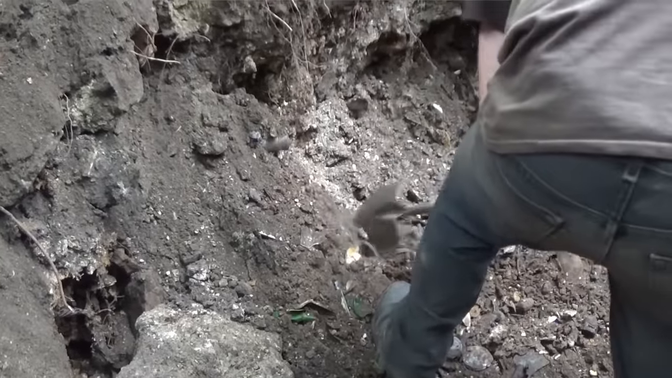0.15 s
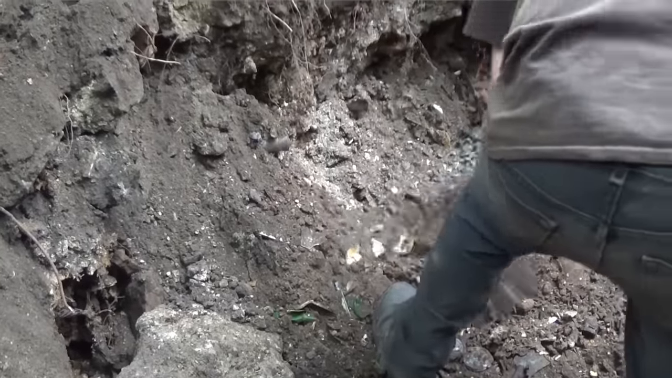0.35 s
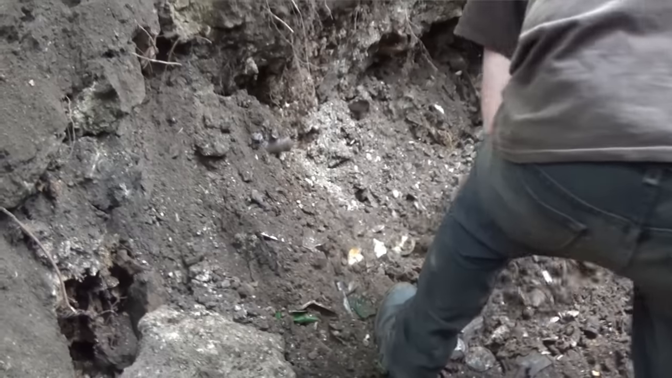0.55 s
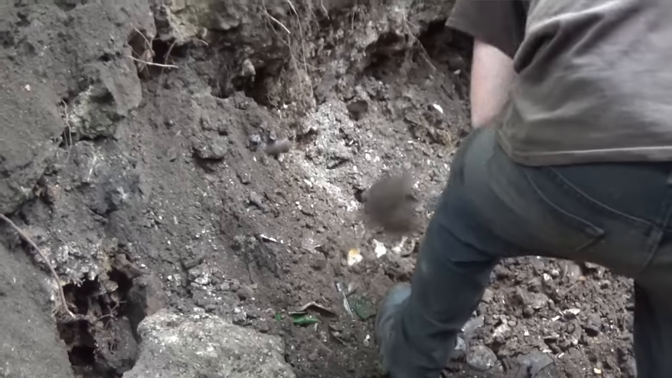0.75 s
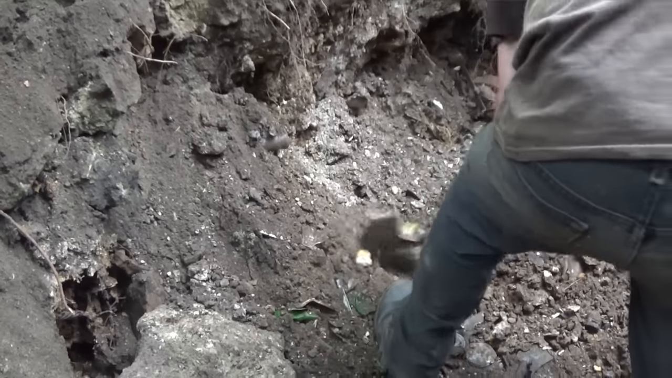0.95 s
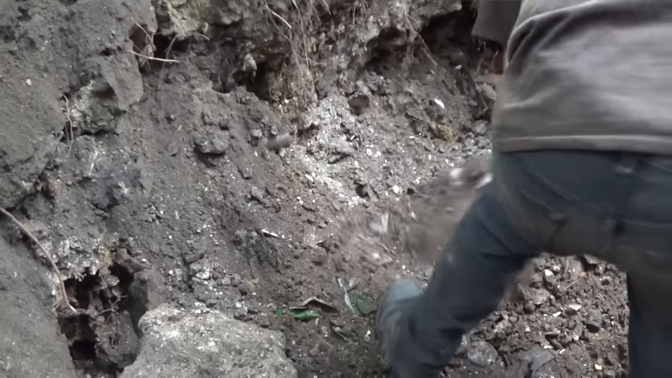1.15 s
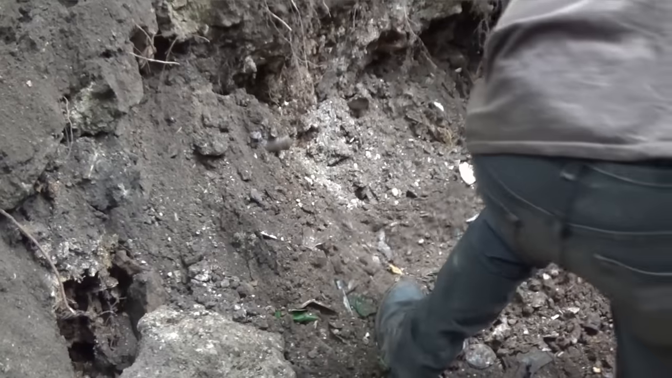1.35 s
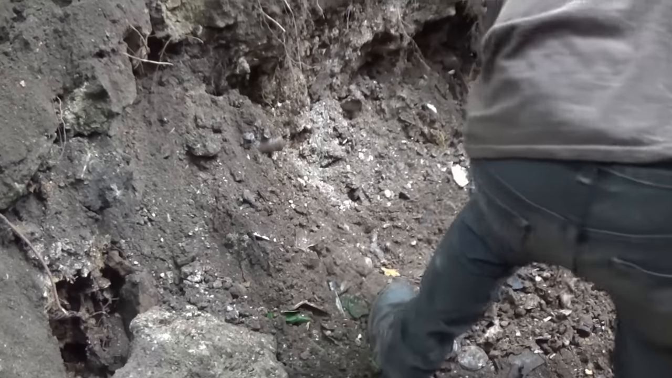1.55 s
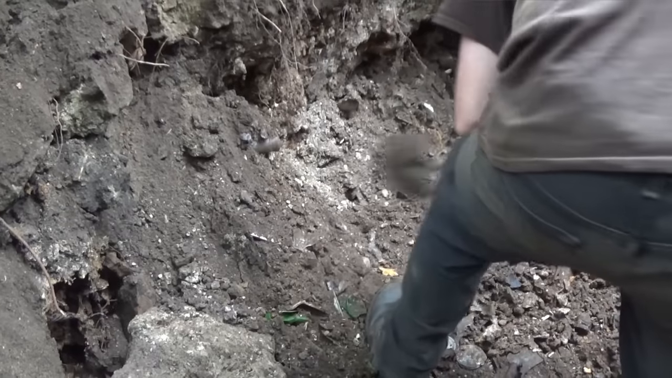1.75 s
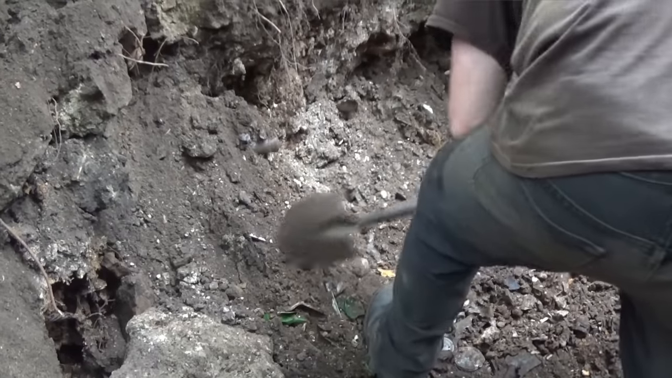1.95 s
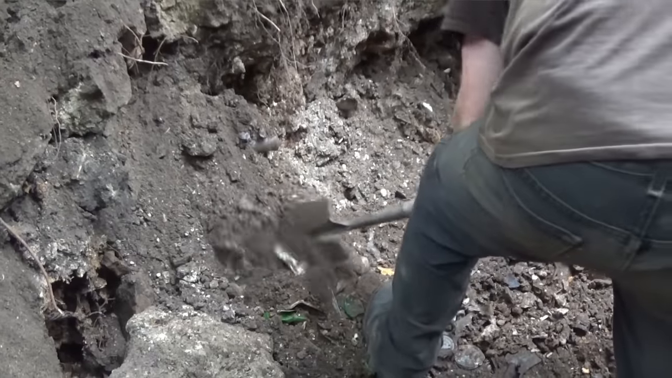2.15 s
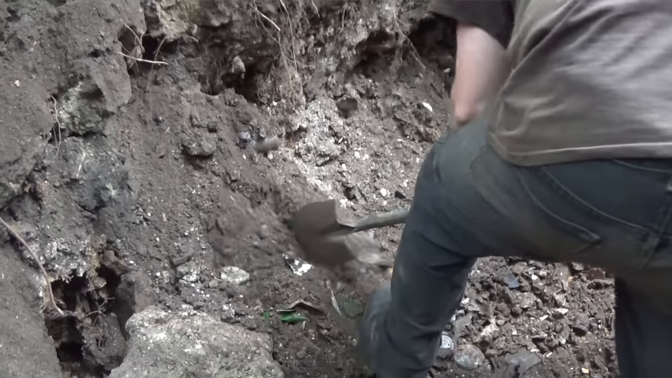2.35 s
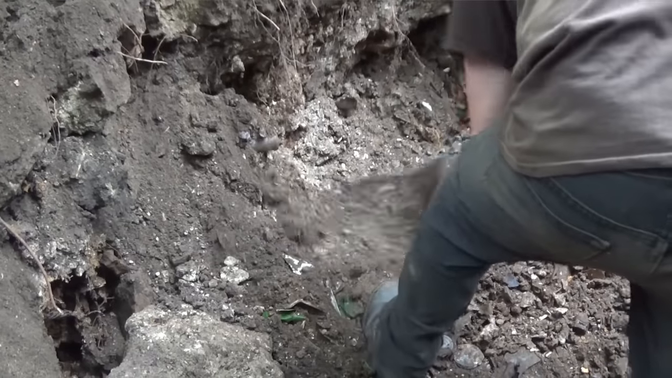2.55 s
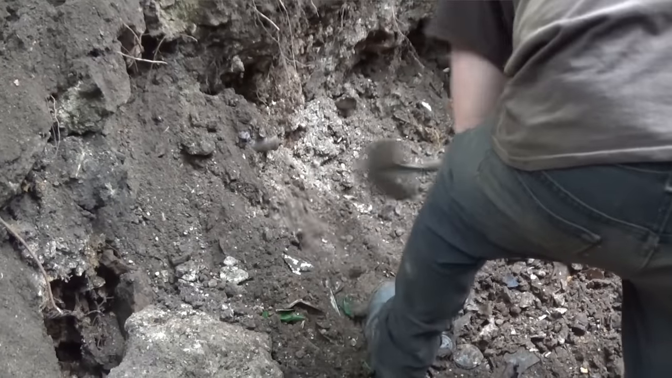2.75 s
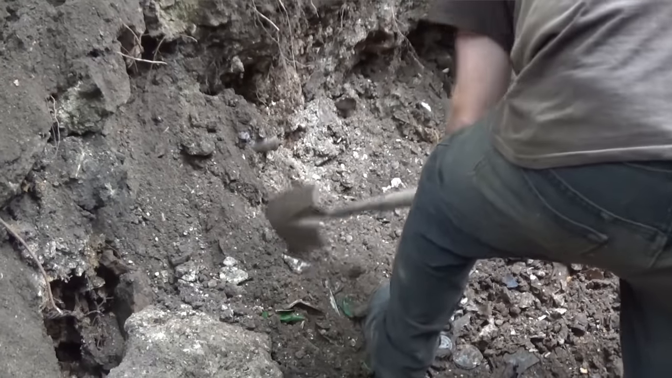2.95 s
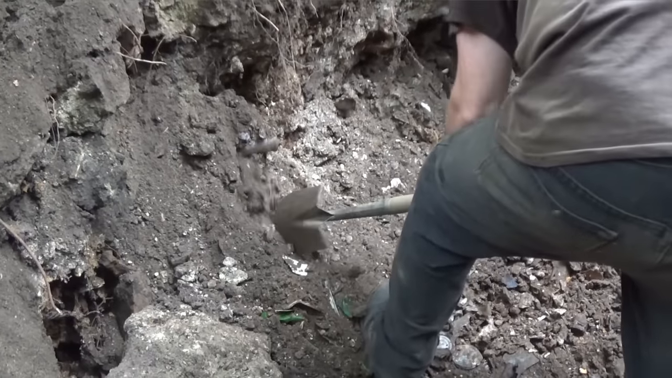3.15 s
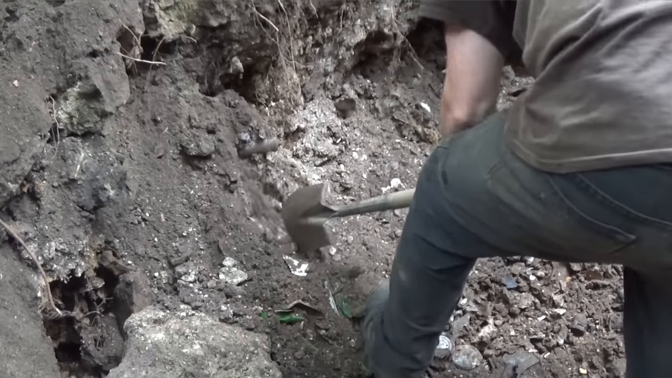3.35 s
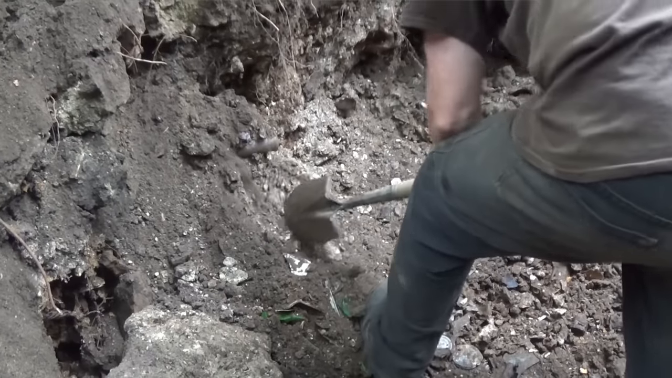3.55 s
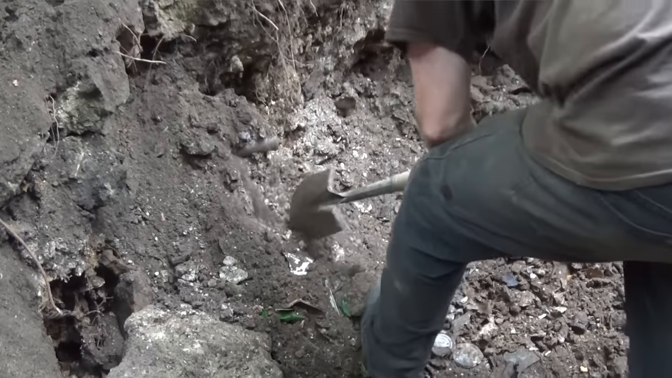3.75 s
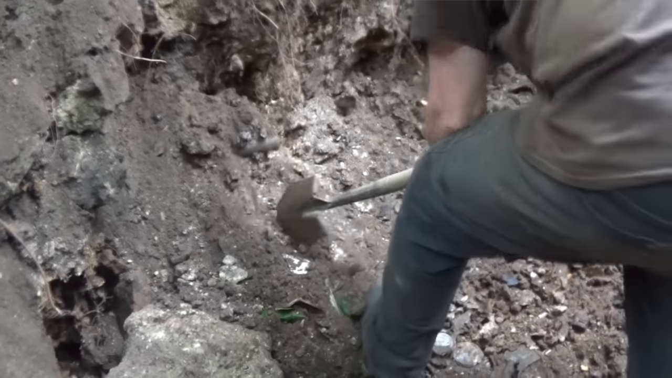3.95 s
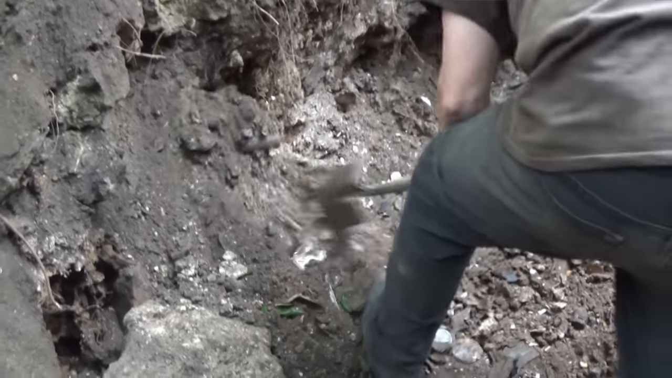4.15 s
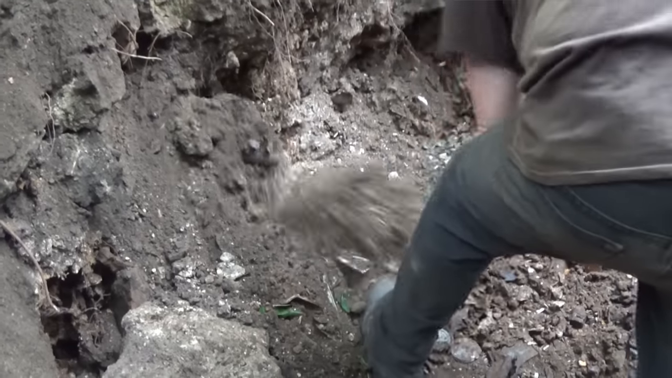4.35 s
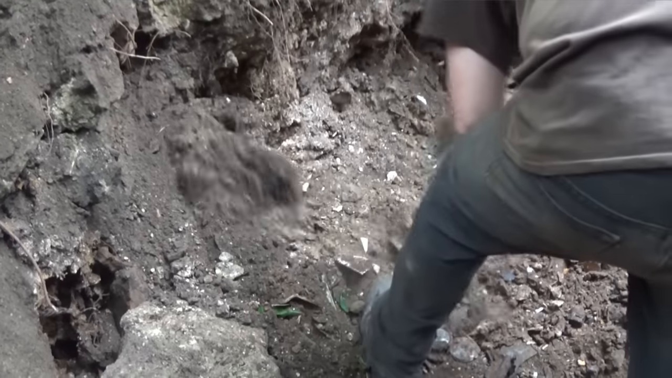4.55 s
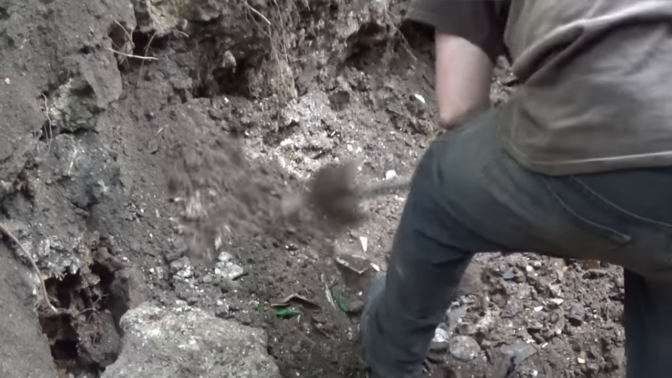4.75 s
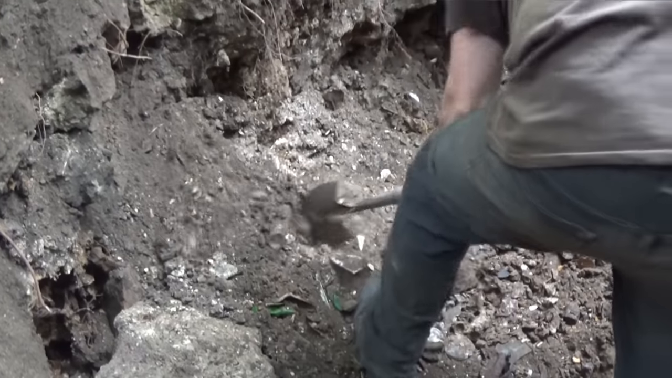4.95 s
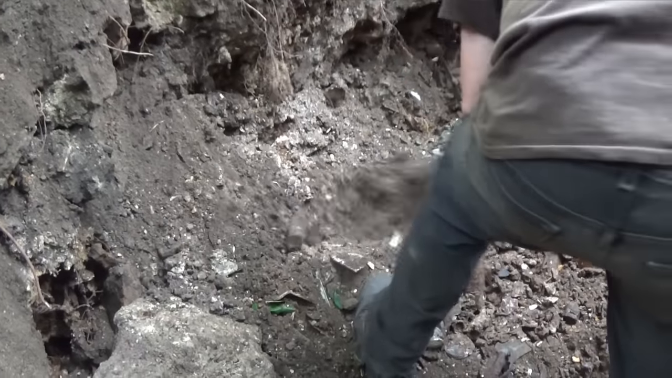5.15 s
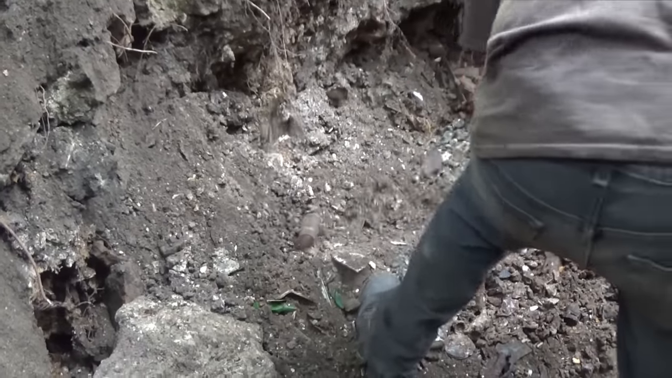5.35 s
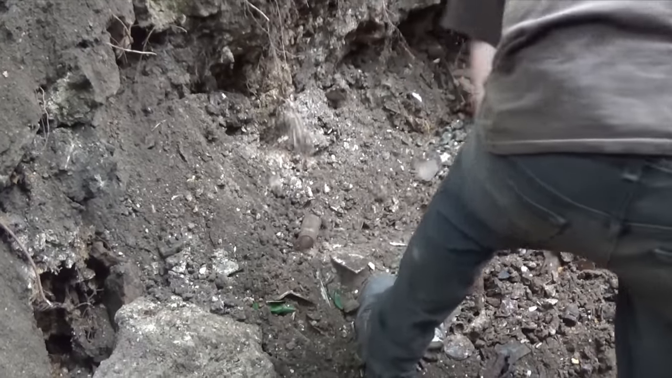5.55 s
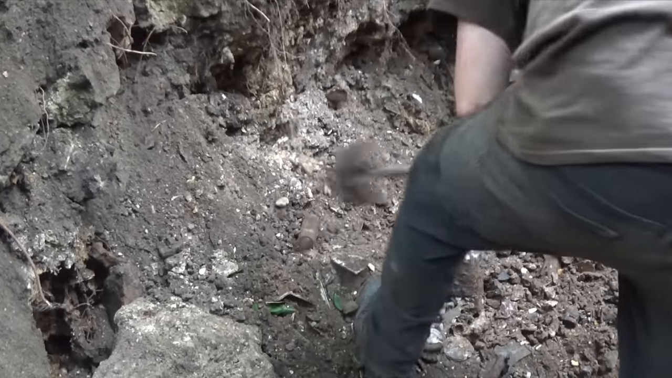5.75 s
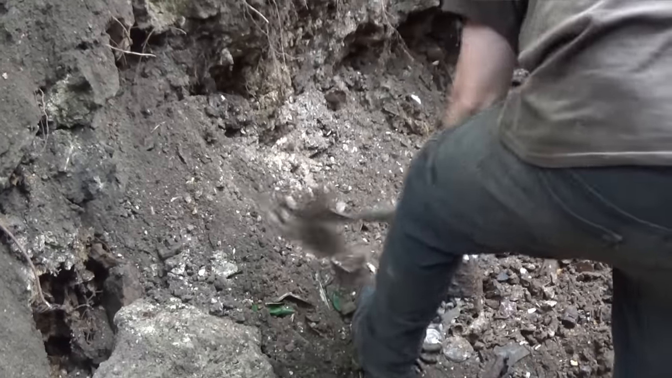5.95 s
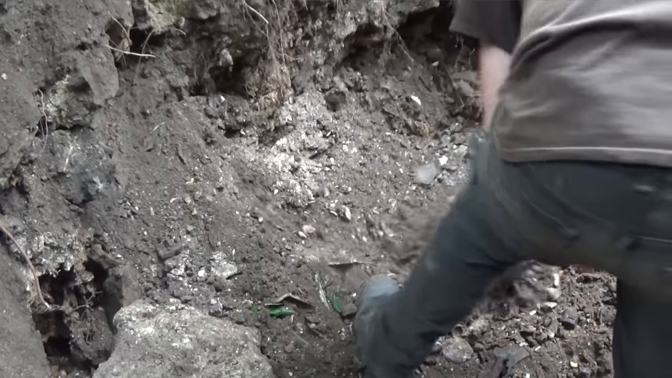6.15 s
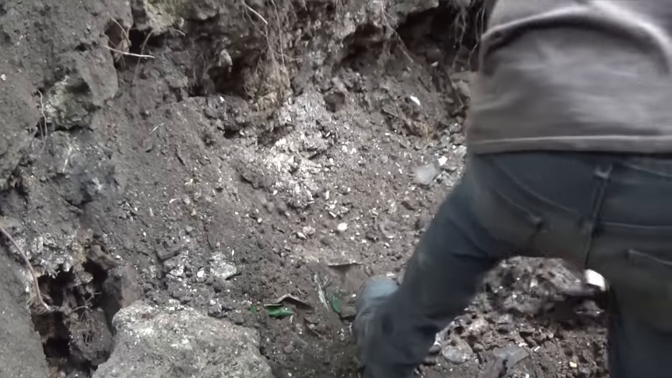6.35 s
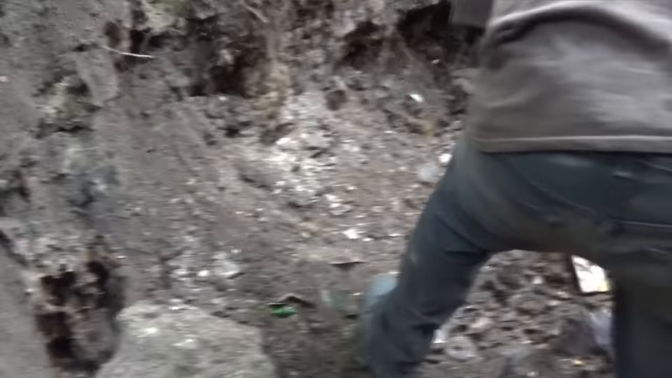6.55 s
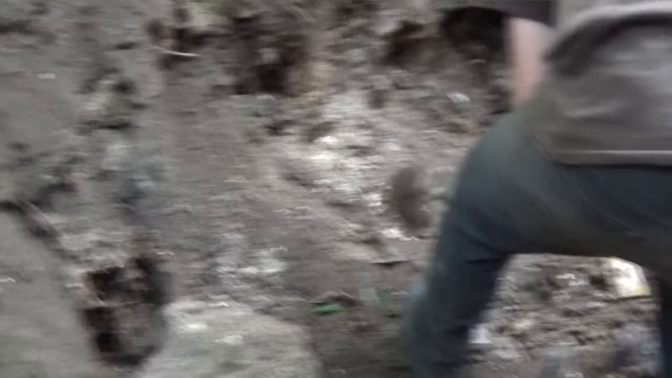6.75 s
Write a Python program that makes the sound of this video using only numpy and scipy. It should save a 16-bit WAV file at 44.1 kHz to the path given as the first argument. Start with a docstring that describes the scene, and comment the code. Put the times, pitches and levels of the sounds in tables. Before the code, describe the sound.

A steel shovel chops and scrapes into a dry bank of soil, stones and broken glass, rubble trickling down with clinking shards, close by outdoors.

```python
"""Shovelling soil, stones and glass

A steel shovel chops into a dry bank of soil, stones and broken glass, outdoors and close by.
Each stroke grinds bursts of grit noise through the blade's resonances; rubble trickles down as looser
noise grains with ringing splinters. Shards clink as decaying sine pairs, stones knock and pebbles tick
as short noise cracks, clods thud as dull noise bursts, and the freed or juddering blade rings."""
import sys
import numpy as np
from scipy import signal
from scipy.io import wavfile
from scipy.ndimage import uniform_filter1d

SR = 44100
rng = np.random.default_rng(int(sys.argv[2]) if len(sys.argv) > 2 else 0)


def log_audio(samples):
    """Write samples as a 16-bit WAV file to the path given in sys.argv[1]."""
    # one column per channel
    frames = np.atleast_2d(samples).T
    # limit to full scale, then quantise
    limited = np.clip(frames, -1, 1)
    pcm = np.round(limited * 32767).astype(np.int16)
    wavfile.write(sys.argv[1], SR, pcm)


N = 303849
TIME = np.arange(N) / SR
BODY_EDGE_HZ = 2200  # noise bands centred above this are grit, the others body
CUTOFF_HZ = 16200
EDGES = 22 * 2 ** (np.arange(30) / 3)  # third-octave band edges, Hz
CENTRES = np.sqrt(EDGES[1:] * EDGES[:-1])
BANK = [signal.butter(2, edge, "band", fs=SR, output="sos") for edge in zip(EDGES, EDGES[1:])]


def from_db(db):
    """Decibels to gain."""
    return 10 ** (np.asarray(db) / 20)


def rms_one(x):
    """Scale to rms 1."""
    return x / np.sqrt(np.mean(x ** 2) + 1e-20)


def evened(x, span_s):
    """Hold the running level near 1 while keeping single grains sharp."""
    power = np.abs(uniform_filter1d(x ** 2, int(span_s * SR)))
    return x / np.sqrt(power + 1e-12)


def add(out, s, sound):
    """Mix a sound in at time s."""
    start = max(int(s * SR), 0)
    out[start:start + len(sound)] += sound[:N - start]


def bands(spectrum, size=N):
    """Third-octave noise bands with the given colour, one per row."""
    hz, db = np.transpose(spectrum)
    gains = from_db(np.interp(np.log(CENTRES), np.log(hz), db))
    white = rng.standard_normal((2, size))  # neighbouring bands use different noise
    rows = [gain * signal.sosfilt(sos, white[k % 2]) for k, (gain, sos) in enumerate(zip(gains, BANK))]
    return np.array(rows)


def ring(clicks, hz, t60):
    """A unit click sets a decaying sine of starting height 1 ringing."""
    r = from_db(-60 / (t60 * SR))
    w = 2 * np.pi * hz / SR
    return signal.lfilter([0, np.sin(w)], [1, -2 * r * np.cos(w), r * r], clicks + 1e-18)


def contacts(per_s, spread_db):
    """Random contacts: sample positions and sizes, many small and a few large."""
    at = np.flatnonzero(rng.random(N) < per_s / SR)
    sizes = from_db(spread_db * np.minimum(rng.exponential(1, len(at)), 3.3))
    return at, sizes


def signed_clicks(per_s, spread_db):
    """Random contacts as single-sample clicks of either sign."""
    at, sizes = contacts(per_s, spread_db)
    clicks = np.zeros(N)
    clicks[at] = sizes * rng.choice([-1, 1], len(at))
    return clicks


def crunch(spectrum, per_s, spread_db, colour_db, edge_decay_s):
    """Grains crack in tiny bursts, each with its own colour; lows die more slowly. Returns grit, body."""
    at, sizes = contacts(per_s, spread_db)
    noise = bands(spectrum)
    tint = rng.standard_normal(len(at))
    for band, hz in zip(noise, CENTRES):
        tint = (tint + rng.standard_normal(len(at))) / np.sqrt(2)  # neighbouring bands are alike
        energy = np.zeros(N)
        energy[at] = (sizes * from_db(colour_db * tint)) ** 2
        # edge_decay_s is the energy time constant at BODY_EDGE_HZ
        keep = np.exp(-1 / (SR * edge_decay_s * np.sqrt(BODY_EDGE_HZ / hz)))
        band *= np.sqrt(signal.lfilter([1 - keep], [1, -keep], energy + 1e-18))
    is_grit = CENTRES > BODY_EDGE_HZ
    return noise[is_grit].sum(0), noise[~is_grit].sum(0)


CHATTER_S, SIDE_MODE_DB = 0.0021, -9.5  # hold before the fade; starting level of the second mode


def shard(hz, t60):
    """A piece holds briefly, then rings in a main mode and a weaker, shorter one at an unrelated pitch."""
    t = TIME[:int((CHATTER_S + t60) * SR) + 1]
    fade = np.exp(-np.log(1000) * np.maximum(t - CHATTER_S, 0) / t60)
    second_hz = hz * 2 ** rng.uniform(-0.496, 0.487)
    main = np.sin(2 * np.pi * hz * t)
    second = from_db(SIDE_MODE_DB) * fade * np.sin(2 * np.pi * second_hz * t)
    return fade * (main + second)


def splinters(per_s, spread_db, base_t60, low_hz, high_hz):
    """Small hard bits ring briefly at random, each at its own pitch."""
    at, sizes = contacts(per_s, spread_db)
    pitches = low_hz + (high_hz - low_hz) * rng.beta(2, 2, len(at))
    decays = base_t60 * 2 ** rng.uniform(0.59, 1, len(at))  # 1.5 to 2 times the base
    out = np.zeros(N)
    for start, size, hz, decay in zip(at, sizes, pitches, decays):
        add(out, start / SR, size * shard(hz, decay))
    return rms_one(out)


def pit(x, t60, dull_hz=6000):
    """The rough earth walls scatter a short, dull echo, made with decaying band-limited noise."""
    t = TIME[:SR // 2]
    scatter = rng.standard_normal(len(t)) * from_db(-60 * t / t60)
    scatter = signal.sosfilt(signal.butter(1, [250, dull_hz], "band", fs=SR, output="sos"), scatter)
    return signal.fftconvolve(x, scatter / np.linalg.norm(scatter))[:N]


BITE_S = 0.0014  # attack of trickles and lumps


def envelope(start, length, attack_s, fall_db_per_s, slope_db=0):
    """Rise, hold for the length while the level slopes, then die away."""
    age = TIME - start
    progress = np.clip(age / length, 0, 1)
    fall_db = fall_db_per_s * np.clip(age - length, 0, 2)
    return np.clip(age / attack_s, 0, 1) * from_db(slope_db * (progress - .5) - fall_db)


# Colour of the open air. Each row: frequency in Hz, band gain in dB.
AIR = [(22, -16), (70, 0.5), (157, -10.5), (400, -12.5), (1900, -14), (8000, -21.5), (16000, -32)]
AIR_DB, HUM_HZ, HUM_DB = -49, 44.8, -53.5  # rms levels in dB


def outdoors():
    """Faint outdoor air as coloured noise, with a low, unsteady drone from a noise-driven resonance."""
    air = rms_one(bands(AIR).sum(0))
    drone = rms_one(ring(rng.standard_normal(N), HUM_HZ, t60=0.65))
    return from_db(AIR_DB) * air + from_db(HUM_DB) * drone


# Steel blade resonances. Each row: frequency in Hz, width in Hz, gain in dB over the plain contact sound.
BLADE = [(679, 180, 8.5), (1240, 360, 5.5), (2460, 72, -5), (3173, 59, 8), (3710, 170, -2), (5860, 56, -34),
         (8090, 130, 2)]


def blade(x):
    """The steel adds its resonances to whatever touches it."""
    out = x.copy()
    for hz, width, db in BLADE:
        r = np.exp(-np.pi * width / SR)
        peak = np.array([1, 0, -1]) * (1 - r * r) / 2
        poles = [1, -2 * r * np.cos(2 * np.pi * hz / SR), r * r]
        out += from_db(db) * signal.lfilter(peak, poles, x)
    return out


# The blade is pushed through the bank. Each row: start in seconds, length in seconds,
# grit level in dB, body level in dB.
STROKES = [(-0.016, 0.037, -16.5, -25), (0.018, 0.026, -22, -31), (0.115, 0.075, -20.5, -37.5),
           (0.199, 0.034, -21, -35), (0.831, 0.079, -20, -33), (0.913, 0.16, -24.5, -38.5),
           (1.996, 0.036, -24, -26.5), (2.023, 0.14, -29, -35.5), (2.156, 0.076, -21, -27),
           (2.333, 0.043, -17.5, -34), (2.384, 0.03, -17.5, -27), (2.94, 0.083, -20.5, -32),
           (3.037, 0.041, -27, -39), (3.319, 0.14, -33, -44.5), (3.385, 0.027, -21, -43),
           (3.538, 0.12, -32, -41), (3.881, 0.0806, -24, -30.5), (4.08, 0.12, -25, -36),
           (4.164, 0.031, -18, -32), (4.198, 0.066, -19, -48), (4.797, 0.057, -17.5, -45),
           (4.852, 0.073, -17, -29), (5.876, 0.043, -25.5, -37), (5.932, 0.089, -17.5, -32.5),
           (6.021, 0.096, -22.5, -33)]
SWELL_S, STOP_S = .016, 0.0075  # rise time; time constant of the stop
BODY_SLOPE_DB = -0.5  # change of the body over a push
TRICKLE_DB, TRICKLE_DB_PER_S = -14.5, 127  # level below the push; speed of dying


def stroke_gains():
    """Grit and body gains: each push swells, holds, stops and leaves a dying trickle."""
    power = np.zeros((2, N))
    stop_db_per_s = 20 / np.log(10) / STOP_S
    for start, length, grit_db, body_db in STROKES:
        trickle = from_db(TRICKLE_DB) * envelope(start, length, BITE_S, TRICKLE_DB_PER_S)
        for part, db, slope_db in zip(power, (grit_db, body_db), (0, BODY_SLOPE_DB)):
            push = envelope(start, length, SWELL_S, stop_db_per_s, slope_db)
            part += from_db(db) ** 2 * (push ** 2 + trickle ** 2)
    return np.sqrt(power)


# Colour of soil scraping on steel, before the blade resonances. Each row: frequency in Hz, band gain in dB.
SCRAPE = [(60, -58), (170, -5.5), (370, -17), (620, -10.5), (2000, -4.5), (6300, 4.5), (10700, 2),
          (16000, -23)]


def strokes():
    """Dense grit and glass grind along the blade, exciting its resonances."""
    grit_gain, body_gain = stroke_gains()
    grit, body = crunch(SCRAPE, per_s=700, spread_db=3.5, colour_db=2, edge_decay_s=0.0019)
    glass = splinters(per_s=900, spread_db=5.0, base_t60=.016, low_hz=1477, high_hz=11450)
    grit = rms_one(grit) + from_db(-6) * glass
    grit = evened(blade(grit), span_s=0.039)
    body = evened(blade(body), span_s=0.052)
    return grit_gain * grit + body_gain * body


def snaps(per_s, spread_db, level_db, hz, t60):
    """Now and then one grain splits with a needle-sharp click, louder where more grit is moving."""
    clicks = signed_clicks(per_s, spread_db)
    moving = np.hypot(stroke_gains()[0], rubble_gains()[0])
    return from_db(level_db) * moving * np.gradient(ring(clicks, hz, t60))


def crumbs(per_s, spread_db, level_db):
    """Single crumbs keep dropping off the bank with tiny bright scattered ticks."""
    at, sizes = contacts(per_s, spread_db)
    drops = np.zeros(N)
    drops[at] = sizes
    bright = np.gradient(pit(drops, t60=0.042))  # the slope favours the treble
    return from_db(level_db) * rms_one(bright)


# Loosened rubble pours down. Each row: start in seconds, length in seconds,
# grit level in dB, body level in dB.
SLIDES = [(0.241, 0.11, -26.5, -37.5), (0.372, 0.14, -30.5, -47.5), (0.546, 0.063, -35, -49),
          (1.06, 0.41, -28, -36), (1.509, 0.14, -27, -31.5), (1.711, 0.19, -29.5, -38.5),
          (2.52, 0.075, -30, -41.5), (3.983, 0.1, -27, -38), (4.277, 0.46, -31.5, -42),
          (4.982, 0.13, -27, -39), (5.147, 0.1, -24.5, -33.5), (5.382, 0.062, -33, -45.5),
          (5.555, 0.098, -39.5, -44.5), (6.077, 0.42, -22.5, -30.5), (6.52, 0.35, -28.5, -38)]
GATHER_S, THINNING_DB, SETTLE_DB_PER_S = 0.033, 3, 123  # rise; drop while pouring; speed of dying
# Lumps of rubble land and burst. Each row: start in seconds, grit level in dB, body level in dB.
LUMPS = [(1.04, -20.5, -50), (1.157, -21.5, -28.5), (1.363, -20, -47), (1.417, -20.5, -50),
         (1.446, -19, -47), (1.556, -18.5, -28), (3.549, -24.5, -47), (3.602, -22, -34),
         (4.131, -19, -22.5), (4.583, -16.5, -30), (5.046, -15.5, -45), (5.096, -38, -28),
         (6.088, -30, -21), (6.174, -21, -34), (6.271, -24, -28.5), (6.405, -22, -32), (6.769, -26, -24.5)]
BURST_S, BURST_DB_PER_S = 0.0061, 448  # a lump crumbles for a moment, then dies away


def rubble_gains():
    """Grit and body gains: slides gather, thin and settle, and lumps burst on top of them."""
    power = np.zeros((2, N))
    for start, length, *levels in SLIDES:
        pour = envelope(start, length, GATHER_S, SETTLE_DB_PER_S, -THINNING_DB)
        power += np.outer(from_db(levels), pour) ** 2
    for start, *levels in LUMPS:
        burst = envelope(start, BURST_S, BITE_S, BURST_DB_PER_S)
        power += np.outer(from_db(levels), burst) ** 2
    return np.sqrt(power)


# Colour of tumbling rubble. Each row: frequency in Hz, band gain in dB.
RUBBLE = [(60, -29), (160, -6), (370, -8), (600, -2.5), (2000, 0.5), (6800, 4), (10900, -3.5), (16000, -33)]
# How much glass the falling rubble holds. Each row: time in seconds, glass level in dB relative to the grit.
GLASSINESS = [(1.1, 1), (1.65, -5.5), (2.6, -3.5), (6.2, -5)]


def slides():
    """Loose crumbs, pebbles and splinters tumble over each other as noise grains and short rings."""
    grit_gain, body_gain = rubble_gains()
    grit, body = crunch(RUBBLE, per_s=380, spread_db=3.5, colour_db=5.0, edge_decay_s=0.0033)
    glass = splinters(per_s=330, spread_db=4.5, base_t60=.019, low_hz=1930, high_hz=11940)
    pebbles = splinters(per_s=220, spread_db=1.5, base_t60=0.032, low_hz=347, high_hz=2507)
    glass_gain = from_db(np.interp(TIME, *np.transpose(GLASSINESS)))
    grit = evened(rms_one(grit) + glass_gain * glass, span_s=0.197)
    body = evened(rms_one(body) + from_db(0.5) * pebbles, span_s=0.069)
    return grit_gain * grit + body_gain * body


# Blade or stone cracks on a stone. Each row: time in seconds, relative strength in dB,
# body trim in dB against the common body level.
KNOCKS = [(0.247, -2.5, -17.5), (0.317, -8, -24), (0.538, -7.5, -26.5), (0.814, -1, -29.5),
          (0.978, -5, -17.5), (1.155, -12.5, -10), (1.558, -16, -6), (1.996, -1.5, -37), (2.027, -7, -10.5),
          (2.084, -4, -13), (2.46, -7, -30), (2.941, -0.5, -47), (3.15, -10.5, -22.5), (3.669, -6, -15),
          (3.865, -12.5, -26), (3.909, -4.5, -26), (4.088, -1.5, -26), (4.8, -0.5, -21), (5.258, -8, -14),
          (5.868, 0, -22), (5.9, -7.5, -12.5), (6.257, -4.5, -23), (6.463, -17, 3.5), (6.688, -5.5, -10),
          (6.835, 0, -23.5)]


def knocks(colour_db, grit_db, body_db, crush_s, t60):
    """A hard contact is one sharp noise crack with a colour of its own; harder ones crush for longer."""
    out, t = np.zeros(N), TIME[:SR // 10]
    noise = bands(SCRAPE, size=SR)
    is_grit = CENTRES > BODY_EDGE_HZ
    for s, db, body_trim_db in KNOCKS:
        start = rng.integers(SR - len(t))
        colour = from_db(colour_db * rng.standard_normal((len(CENTRES), 1)))
        piece = noise[:, start:start + len(t)] * colour
        grit = rms_one(blade(piece[is_grit].sum(0)))
        body = rms_one(blade(piece[~is_grit].sum(0)))
        crack = from_db(grit_db) * grit + from_db(body_db + body_trim_db) * body
        crush = from_db(-60 * np.maximum(t - crush_s * from_db(db), 0) / t60)
        add(out, s, crack * from_db(db) * crush)
    return out


# Glass shards and stones clink. Each row: time in seconds, main pitch in Hz, main mode level in dB,
# t60 in seconds.
CLINKS = [(0.452, 5230, -12.5, .035), (.454, 5840, -23.5, .2), (.476, 8130, -18.5, 0.044),
          (.632, 7500, -25.5, 0.075), (.668, 4200, -39, 0.073), (1.552, 13178, -19, .03),
          (1.556, 455, -30, .07), (1.588, 6230, -20, .018), (1.618, 5500, -16, 0.033),
          (1.636, 5180, -9.5, 0.021), (1.666, 4560, -11, 0.033), (1.757, 6060, -19, .018),
          (1.876, 5530, -13, 0.082), (2.508, 5670, -28, 0.039), (2.508, 9800, -22, 0.064),
          (4.577, 4980, -14.5, 0.013), (4.823, 5940, -16.5, 0.24), (5.287, 6830, -22.5, .04),
          (5.657, 6900, -15.5, 0.012), (6.276, 624, -19.5, 0.11), (6.31, 7000, -15, 0.036),
          (6.696, 737, -25.5, 0.1), (6.696, 1510, -23.5, 0.082), (6.771, 3007, -14, 0.12),
          (6.77, 6500, -23, 0.2)]


def clinks(tick_db, tick_t60):
    """A struck piece rings in two modes, with a noise tick at the contact."""
    out, t = np.zeros(N), TIME[:SR // 2]
    for s, hz, db, t60 in CLINKS:
        add(out, s, from_db(db) * shard(hz, t60))
        add(out, s, rng.standard_normal(len(t)) * from_db(db + tick_db - 60 * t / tick_t60))
    return out


# A pebble or chip ticks once. Each row: time in seconds, peak level in dB before panning, pitch in Hz.
TICKS = [(1.021, -15, 4560), (1.201, -9, 5200), (1.306, -11, 3460), (1.716, -16.5, 1480),
         (2.253, -19, 1250), (2.267, -14, 1450), (2.461, -12, 2540), (3.263, -10, 8000), (3.8, -14.5, 5960),
         (4.025, -15, 830), (4.291, -8.5, 6300), (4.367, -9, 7160), (4.452, -7.5, 3060), (4.75, -12, 5600),
         (4.97, -10, 3530), (5.202, -8.5, 2500), (6.612, -10.5, 7500), (6.655, -12, 1220),
         (6.688, -6, 2020)]


def ticks(edge_t60, width_octaves, crack_db):
    """A tiny crack sets a heavily damped pebble sounding; lower ones last longer."""
    out, t = np.zeros(N), TIME[:SR // 10]
    for s, db, hz in TICKS:
        t60 = edge_t60 * np.sqrt(BODY_EDGE_HZ / hz)
        crack = rng.standard_normal(len(t)) * from_db(-60 * t / t60)
        edges = np.minimum(hz * 2 ** (width_octaves * np.array([-.5, .5])), CUTOFF_HZ)
        pebble = signal.sosfilt(signal.butter(2, edges, "band", fs=SR, output="sos"), crack)
        tick = rms_one(pebble) + from_db(crack_db) * rms_one(uniform_filter1d(crack, size=3))
        add(out, s, from_db(db) * tick / np.abs(tick).max())
    return out


# Clods landing. Each row: time in seconds, relative level in dB.
THUDS = [(1.16, -26), (1.554, -27), (5.199, -30), (6.411, -14.5), (6.462, -13.5)]
# Dull colour of a landing clod. Each row: frequency in Hz, band gain in dB.
CLOD = [(70, -25), (140, -10), (210, -4.5), (330, -16.5), (1000, -15), (3000, -23), (9000, -46)]


def thuds(rise_s, t60, level_db):
    """Soft clods land with a dull, short noise burst."""
    push = np.zeros(N)
    for s, db in THUDS:
        age = np.maximum(TIME - s, 0)
        push += (1 - np.exp(-age / rise_s)) * from_db(db - 60 * age / t60)
    return from_db(level_db) * push * evened(bands(CLOD).sum(0), span_s=0.036)


# The blade swings clear of the soil and rings on. Each row: time in seconds, relative strength in dB.
RELEASES = [(1.446, -3.5), (2.607, -7.5)]
# Modes of the free blade. Each row: frequency in Hz, level in dB relative to the release.
BLADE_MODES = [(797, -43.5), (4500, -24), (4759, -32), (4870, -29), (7106, -36), (8301, -23), (9528, -23)]
RING_CYCLES = 1500  # cycles to fall by 60 dB, so higher modes die sooner


def free_blade():
    """Let go by the soil, the steel rings in clean modes."""
    touch = np.zeros(N)
    for s, db in RELEASES:
        touch[int(s * SR)] = from_db(db)
    return sum(from_db(db) * ring(touch, hz, RING_CYCLES / hz) for hz, db in BLADE_MODES)


# The levered blade judders over stones. Each row: start in seconds, end in seconds, level in dB.
JUDDERS = [(2.025, 2.235, -36), (2.968, 3.03, -26), (3.03, 3.085, -36)]


def judders(per_s, t60):
    """Quick, uneven slips excite the hollow-sounding second resonance of the blade."""
    slips = signed_clicks(per_s, spread_db=5.5)
    push = np.zeros(N)
    for start, end, db in JUDDERS:
        push[(TIME >= start) & (TIME < end)] = from_db(db)
    second_hz = BLADE[1][0]
    return push * evened(np.gradient(ring(slips, second_hz, t60)), span_s=0.039)


# Where the rubble falls, on the bank or the spoil heap. Each row: time in seconds,
# gain in dB added on the right and taken off the left.
HEAP = [(1.2, 0.7), (1.65, 3), (2.4, 0), (5.9, 0.74), (6.7, 3)]


def scene():
    """The blade works straight ahead; the rubble scatters more widely and leans to the right."""
    ahead = strokes() + judders(per_s=380, t60=0.0082) + free_blade()
    ahead += knocks(colour_db=3.5, grit_db=-14.0, body_db=-4.0, crush_s=0.0093, t60=0.045)
    ahead += snaps(per_s=45, spread_db=0.5, level_db=17, hz=6000, t60=0.00078)
    falling = slides() + crumbs(per_s=14, spread_db=3.5, level_db=-53.0)
    falling += ticks(edge_t60=0.021, width_octaves=0.85, crack_db=-10)
    falling += clinks(tick_db=-15, tick_t60=0.0052)
    clods = thuds(rise_s=0.0021, t60=0.14, level_db=-2.0)

    rightward = np.array([[-1], [1]])  # rows are left and right
    pan_db = np.interp(TIME, *np.transpose(HEAP)) * rightward
    direct = ahead + clods + falling * from_db(pan_db)
    # scatter of opposite sign in the two channels widens the image
    side = from_db(-23) * pit(ahead, t60=0.08)
    side += from_db(-17.0) * pit(falling + clods / 2, t60=0.086, dull_hz=3860)
    echo = from_db(-19.5) * pit(ahead + falling, t60=.28)
    return direct + side * rightward + echo + outdoors()


def record(dry):
    """The loudest cracks are rounded off and the top is cut."""
    ceiling = .65
    rounded = ceiling * np.tanh(dry / ceiling)
    return signal.sosfilt(signal.ellip(10, .2, 80, CUTOFF_HZ, fs=SR, output="sos"), rounded)


dry = scene()
out = record(dry)
log_audio(out)
```